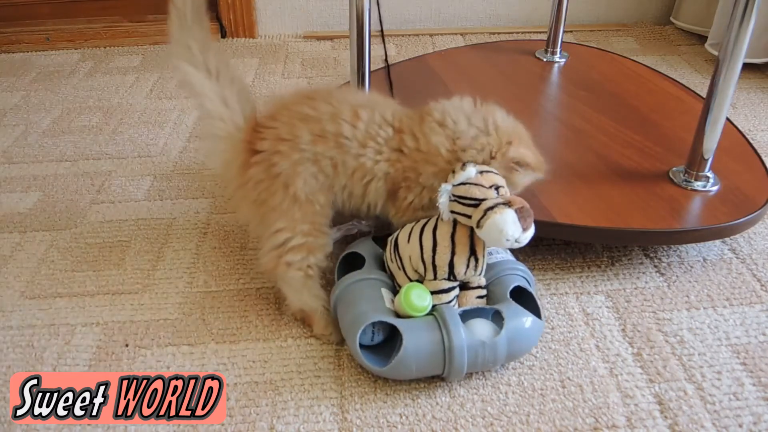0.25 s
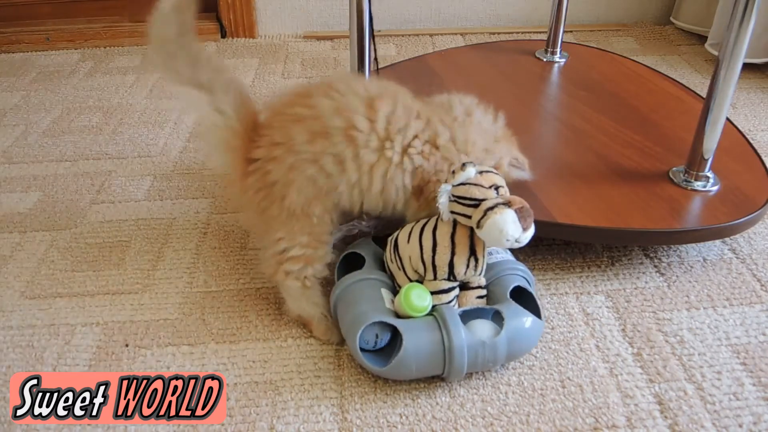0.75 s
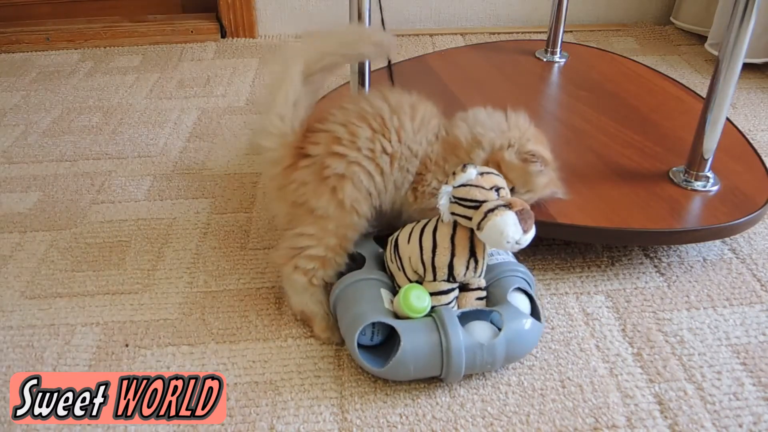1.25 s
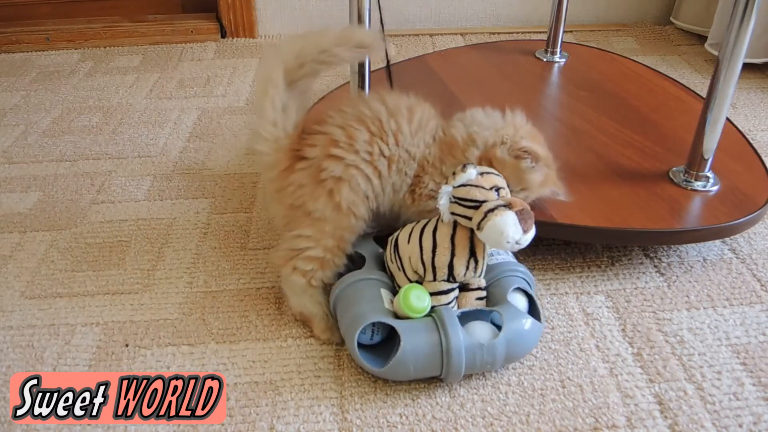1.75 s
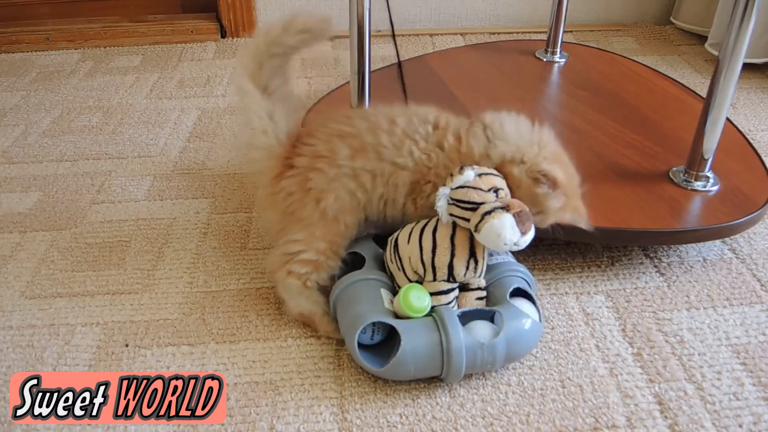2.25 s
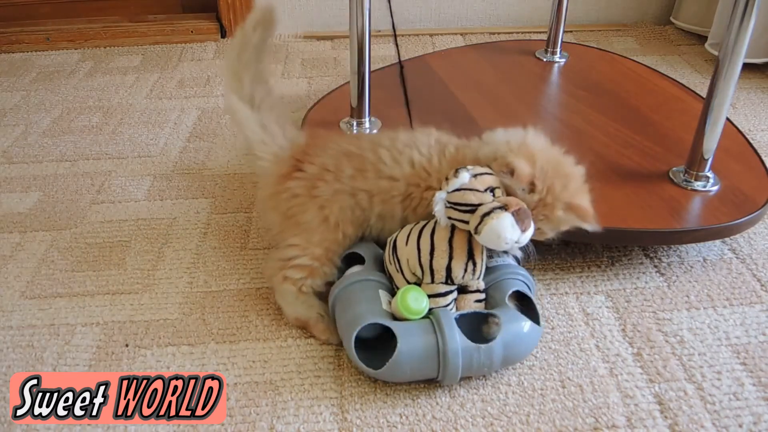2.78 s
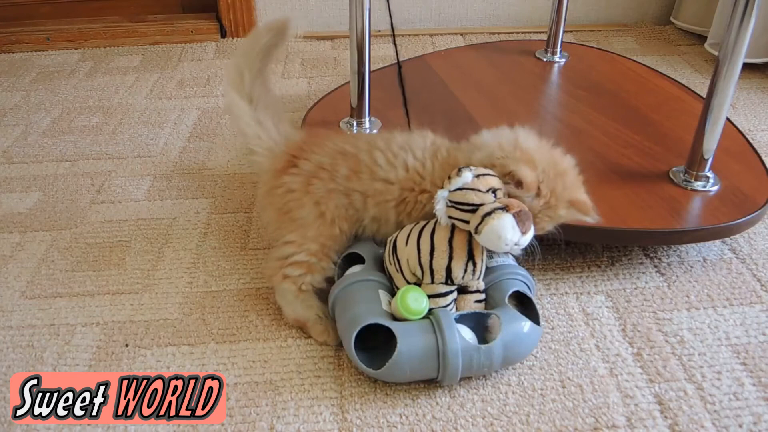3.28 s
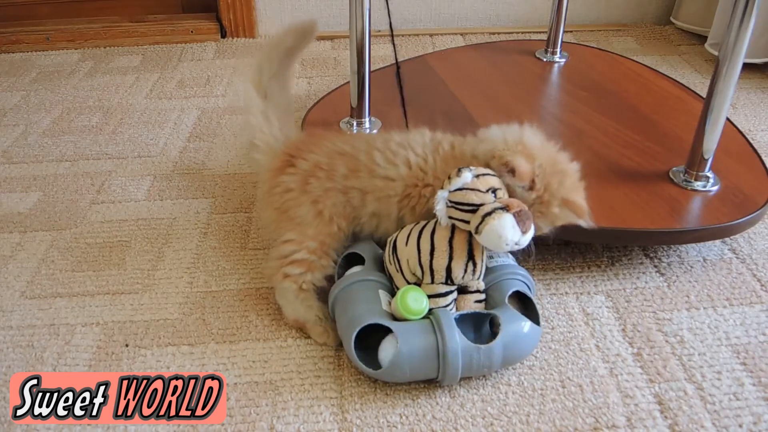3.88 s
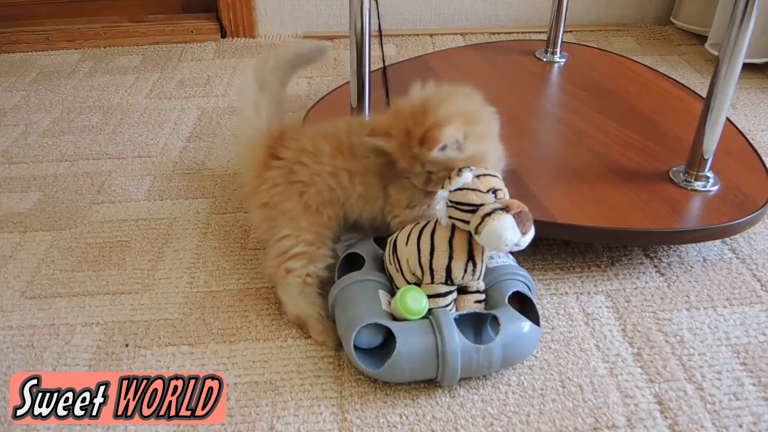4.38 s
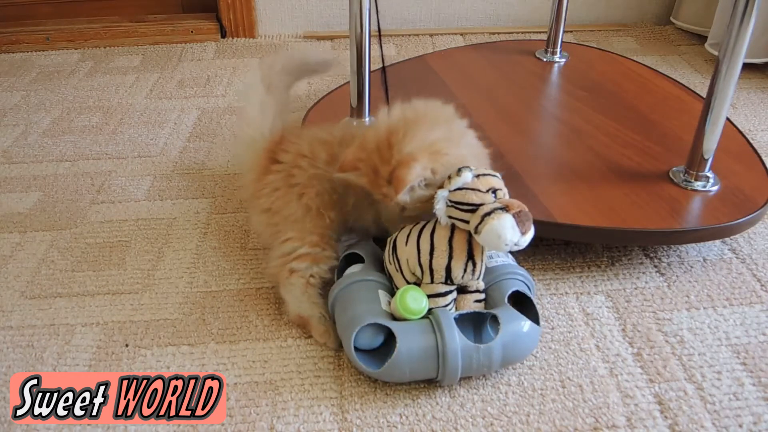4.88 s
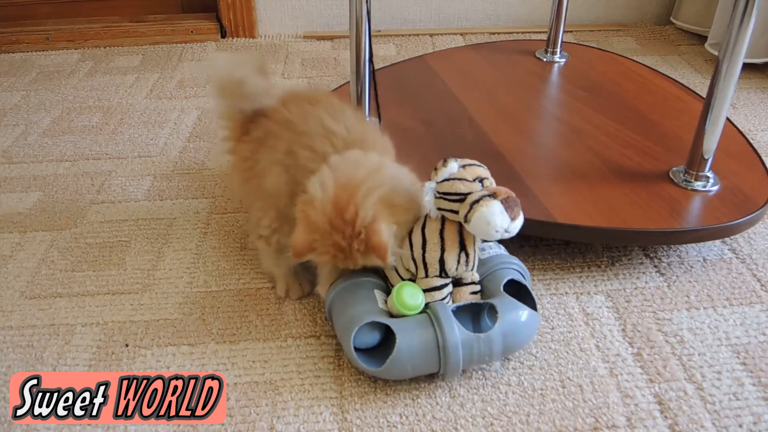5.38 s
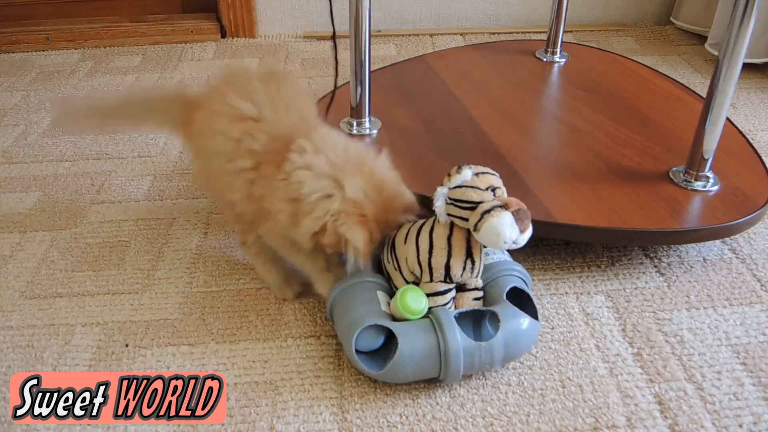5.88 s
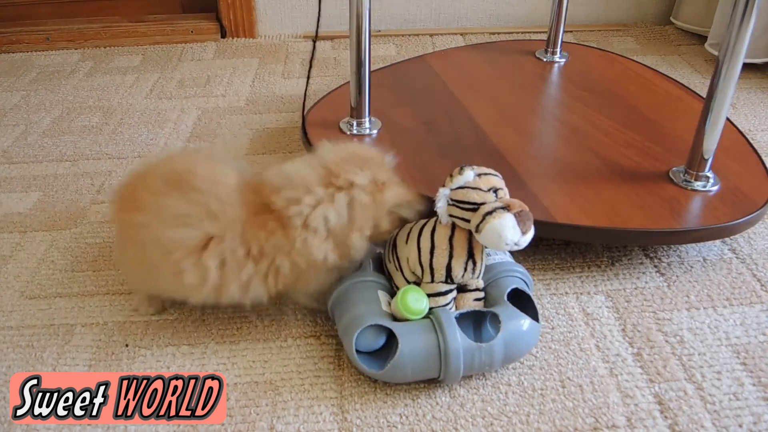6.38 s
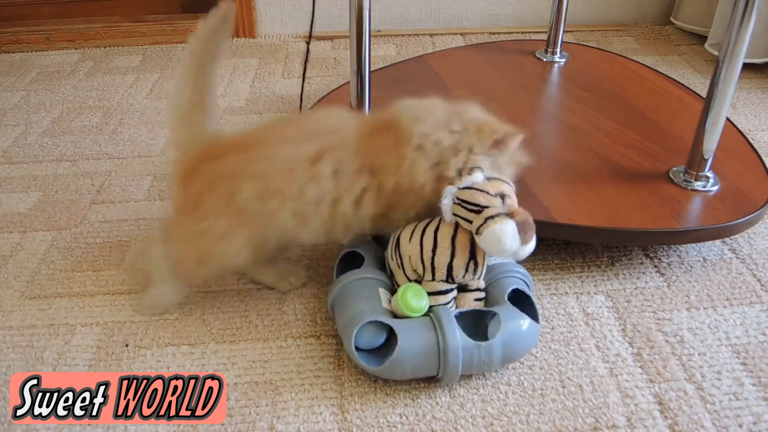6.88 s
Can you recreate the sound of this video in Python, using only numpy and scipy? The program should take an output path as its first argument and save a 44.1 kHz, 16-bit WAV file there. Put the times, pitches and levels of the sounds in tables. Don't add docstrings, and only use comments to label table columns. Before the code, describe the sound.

Soft room hum and microphone hiss run throughout in a quiet carpeted room, heard in stereo from about a metre. For the first two seconds there is only a very faint tap at 0.1, light fur brushing and barely audible claw scrapes. At 2.5 quick plastic knocks begin, and from 2.75 to 2.9 a swatted ball rattles loudly round a hollow tube, with bright clacks and woody resonance, settling in tiny bounces until 3.1. Single light knocks follow at 3.2, 3.3 and 3.6, then weak ones around 4.2 to 4.4. A distinct hollow ball drop lands at 4.55. Faint clicks and scratching come near 5.2, then soft brushing. From 5.9 scuffs and claw scrapes grow busier, with taps and a low soft paw thud near 6.2. A second, longer clatter runs from 6.4 to 6.9, thinning to a few small knocks and a faint scrape just after 7.

```python
import sys
import numpy as np
from scipy import signal
from scipy.fft import rfft, irfft
from scipy.io import wavfile
from scipy.ndimage import uniform_filter1d

SR = 44100
rng = np.random.default_rng(int(sys.argv[2]) if len(sys.argv) > 2 else 0)


def put_to_file(sound):
    columns = np.atleast_2d(sound).T
    safe = np.clip(columns, -1, 1)
    whole_steps = np.round(safe * 32767)
    wavfile.write(sys.argv[1], SR, whole_steps.astype(np.int16))


def boost(x):
    u = np.asarray(x, float) / 20
    return 10 ** u


N = 314874
RING_SAMPLES = 2048

# freq_hz, density_db
AIR_SPECTRUM = [(22, -11), (65, -4), (95, -6), (200, -4), (240, -2), (325, -8), (410, -3.5), (500, -8.5),
                (700, -10.5), (950, -13.5), (2000, -18), (5700, -20.5), (10000, -23.5), (14250, -28),
                (14500, -35)]
# freq_hz, side_re_mid_db
AIR_WIDTH = [(60, -10), (110, -5.5), (200, -8), (380, -8.5), (700, -5), (1290, -3.5), (2380, -2), (4400, 0),
             (8120, -4), (15000, -2.5)]
# freq_hz, width_hz, level_db
TUBE_MODES = [(356, 180, -8.5), (620, 510, 1.5), (896, 183, 2.5), (1160, 68, 7), (1445, 580, -2),
              (1800, 300, -4)]
# freq_hz, width_hz, level_db
WALL_MODES = [(2320, 680, 12.5), (3000, 275, 18.5), (3600, 1500, 11), (4750, 400, -36), (5560, 1700, 16.5)]
# freq_hz, width_hz, level_db
PORT_MODES = [(9020, 400, 2), (7000, 1100, -13), (9980, 600, 0), (11700, 2400, -7), (14600, 2500, -19)]
# start_s, blow_db, tube_hz, wall_hz, crack_re_blow_db
TAPS = [(0.133, -44.5, 1110, 4900, -10), (2.527, -25.5, 1240, 2860, -13), (2.53, -29.5, 870, 4370, -12),
        (2.561, -22, 870, 3600, -16), (2.575, -33, 1260, 4100, 4), (2.596, -26, 800, 2580, -40),
        (3.166, -30.5, 1100, 3600, -11.5), (3.325, -30, 1130, 5300, -13.5), (3.614, -29.5, 600, 4100, -17),
        (3.631, -40, 576, 3880, -17), (3.645, -34, 650, 3770, -22), (4.208, -37, 1040, 4140, -15.5),
        (4.222, -51, 1180, 2400, -21), (4.376, -36, 1040, 1800, -19), (5.181, -43, 700, 2400, -18),
        (5.266, -43, 1010, 4300, 1.5), (6.129, -33.5, 1360, 3270, -19), (6.189, -31, 1110, 3520, -20),
        (6.205, -29, 1280, 3020, -25), (6.279, -26.5, 1060, 2880, -19), (6.433, -28, 920, 2040, -22),
        (6.437, -18, 660, 2640, -24), (6.484, -21, 900, 3600, -7), (7.045, -27, 1020, 3040, -21)]
# start_s, blow_db, wall_hz, crack_re_blow_db
FIRST_RUN = [(2.732, -35, 2280, 3), (2.764, -8.5, 2000, -20.5), (2.773, -34, 4400, -11),
             (2.778, -16.5, 2800, -25), (2.782, -20, 3660, -16), (2.8054, -13, 4470, -19),
             (2.817, -13, 3540, -6), (2.823, -33, 3770, -21), (2.835, -18, 2040, -26),
             (2.841, -15, 2300, -13), (2.8785, -18.5, 3430, -15), (2.885, -14, 2000, -25),
             (2.897, -32, 3370, -2), (2.905, -34, 3250, 1), (2.912, -39, 3170, 1)]
# start_s, blow_db, wall_hz, crack_re_blow_db
SECOND_RUN = [(6.453, -14.5, 3850, -27), (6.463, -40, 2330, -16), (6.503, -13.5, 2900, -22),
              (6.521, -34, 2840, -27), (6.534, -17, 3000, -27), (6.551, -14, 3100, -48),
              (6.57, -19, 3140, -34), (6.596, -14, 2740, -29), (6.61, -31, 3000, -24),
              (6.623, -36, 2630, -24), (6.63, -17, 3000, -28), (6.659, -19.5, 3070, -30),
              (6.666, -14.5, 3100, -38), (6.689, -20, 3660, -24), (6.754, -38, 2830, -22),
              (6.795, -16, 1940, -18), (6.802, -20, 3030, -24), (6.813, -26, 3120, -36),
              (6.836, -21, 1900, -11.5), (6.863, -23, 3500, -17), (6.879, -41, 2980, -21),
              (6.894, -44, 3000, -5), (6.914, -38, 3000, -25), (7.017, -32, 3000, -46),
              (7.072, -33, 3000, -20)]
# start_s, blow_db
SETTLING = [(2.927, -23), (2.939, -20.5), (2.959, -25), (2.968, -29), (2.984, -23.5), (2.99, -29),
            (3.002, -24), (3.017, -47), (3.028, -31), (3.046, -40), (3.076, -36), (4.439, -41.5)]
# time_s, pitch_hz
BALL_PITCH = [(2.76, 1266), (2.89, 1340), (2.93, 1205), (3.08, 1140), (4.56, 1247), (6.45, 1360),
              (6.5, 1066), (6.66, 1070), (6.82, 1170), (7.05, 1020)]
# start_s, blow_db, wall_hz, wall_re_blow_db, crack_re_blow_db
CLAW_TAPS = [(.817, -59.5, 3300, 4, -13), (0.818, -56, 2120, 0, -24), (0.869, -55, 3200, -3, -14),
             (2.342, -45.5, 3220, 2.5, 0), (2.342, -54, 4600, 8.5, -20), (2.574, -29, 5570, -4, -30),
             (3.604, -41, 2000, -14, -17), (4.56, -12, 3100, -29.5, -19.5), (4.694, -40, 2110, -21, -20),
             (5.269, -48.5, 1920, 0, -30), (5.926, -43, 4550, -12, 11), (6.096, -52, 4600, -2.5, -11),
             (6.246, -36.5, 2250, -8.5, -16), (6.258, -42, 3500, 0, -2), (6.327, -39.5, 2580, -3.5, -26),
             (6.735, -16, 2200, -16.5, -13), (6.763, -28, 2880, -11.5, -12), (7.132, -39, 4860, -3, -10)]
# time_s, rolling_db, paw_pressure_db
DRIVES = [
    [(2.654, -63, -53), (2.734, -57, -45), (2.794, -39.5, -42), (2.87, -48, -37), (2.914, -49, -42.5),
     (2.982, -54, -42), (3.062, -56.5, -51), (3.124, -64, -70), (3.288, -80, -78)],
    [(6.33, -72, -62), (6.458, -45, -47), (6.524, -56, -39.5), (6.596, -51, -42.5), (6.678, -58, -37.5),
     (6.736, -48.5, -46), (6.824, -53, -49), (6.878, -51, -59), (7.01, -80, -95)],
]
# peak_s, rise_s, fall_s, level_db
BRUSHES = [(.15, 0.044, 0.048, -53), (1.27, 0.092, 0.042, -55.5), (2.14, .033, 0.028, -52),
           (2.4, 0.2, 0.1, -56), (2.43, 0.063, 0.068, -47), (2.445, .004, .014, -48),
           (3.22, 0.048, 0.062, -45.5), (3.345, 0.015, 0.019, -44), (4.36, 0.08, 0.064, -54.5),
           (5.52, 0.11, 0.069, -53), (5.8, .06, 0.14, -49), (5.91, 0.0052, 0.004, -39),
           (5.938, .003, 0.007, -40), (5.952, .006, .009, -37), (5.99, 0.01, .01, -46),
           (6.125, .005, .012, -50), (6.16, 0.014, 0.0079, -56), (6.223, .003, .003, -45),
           (6.26, .005, 0.0071, -37), (6.3, 0.022, 0.0089, -51), (6.352, .003, .015, -45),
           (3.185, .008, .005, -50), (3.25, 0.0099, 0.027, -60), (2.415, 0.015, .012, -60),
           (6.463, .008, 0.0035, -47), (2.73, 0.0034, .008, -38), (2.828, .006, .008, -46),
           (6.387, 0.0073, 0.01, -19.5), (6.397, .005, .01, -27), (6.413, 0.006, 0.014, -37),
           (6.665, 0.015, 0.015, -29.5), (6.69, .008, 0.0095, -34), (6.708, 0.0087, 0.01, -42),
           (2.756, 0.022, 0.035, -27.5)]
# peak_s, rise_s, fall_s, level_db
SCRAPES = [(.3, 0.39, 0.24, -75), (.29, 0.0087, 0.011, -58), (2.26, 0.027, .03, -61.5),
           (.58, 0.04, 0.029, -63.5), (.96, 0.047, 0.14, -57.5), (1.12, 0.011, 0.013, -60.5),
           (2.575, 0.048, 0.0059, -46), (2.69, 0.0063, 0.048, -46.5), (4.7, .015, 0.028, -56.5),
           (5.156, 0.0093, 0.016, -48), (5.36, 0.11, 0.038, -54.5), (6.016, 0.012, 0.0058, -42.5),
           (6.2, 0.15, 0.24, -54), (6.262, 0.029, 0.03, -46), (6.332, 0.0044, 0.0077, -57),
           (6.16, .02, 0.01, -49), (2.4, .012, 0.015, -55), (6.364, 0.0062, .015, -39),
           (6.39, 0.012, 0.0089, -44), (6.412, 0.0071, 0.021, -36.5), (6.459, 0.016, 0.0048, -34),
           (6.71, 0.016, 0.0082, -45), (7.096, 0.0043, 0.013, -42), (7.14, 0.31, .03, -59)]
# peak_s, rise_s, fall_s, level_db
SHOVES = [(.96, 0.07, 0.032, -60.5), (2.45, .004, .014, -58), (2.55, 0.089, 0.06, -56),
          (2.753, 0.008, 0.016, -29.5), (2.841, 0.012, 0.0032, -30), (3.625, 0.012, 0.035, -54),
          (4.567, 0.0025, 0.013, -51), (4.22, 0.01, 0.038, -54), (5.272, 0.0027, 0.01, -49),
          (6.335, 0.0042, 0.014, -43), (6.91, 0.081, 0.02, -56.5), (7.13, 0.12, 0.033, -58)]
# tube_db, wall_db, fur_db
STROKE_MIX = [
    (-24, -16, -1.5),
    (-14, -5, -0.5),
    (-3.5, -8.5, -3.5),
]
# start_s, level_db, pitch_hz, decay_s
TICKS = [(2.571, -25, 6940, 0.0011), (2.69, -41, 2210, 0.0037), (2.709, -37, 2500, .002),
         (2.719, -42, 2600, 0.0025), (2.938, -40, 4100, .002), (2.963, -43, 4240, .006),
         (2.992, -37, 1950, 0.0018), (2.984, -43, 3430, 0.0017), (3.032, -40, 4050, .002),
         (3.618, -34, 6860, 0.00084), (3.632, -37, 4100, 0.0011), (3.634, -39, 6900, .001),
         (3.645, -41, 6700, .001), (3.645, -48, 3950, .001), (5.267, -28.5, 4330, 0.00097),
         (5.269, -28.5, 7700, 0.00078), (6.016, -48, 3060, 0.0015), (6.254, -43, 2480, .003),
         (6.41, -32, 2320, 0.0032), (6.432, -31, 7100, 0.0011), (6.81, -31, 6000, 0.001),
         (6.484, -17, 8720, 0.0021), (2.818, -23, 3740, 0.0032), (2.784, -21, 3600, 0.0022),
         (0.942, -59, 3330, .012), (0.972, -56, 3900, 0.013), (2.909, -35, 3330, .002),
         (2.888, -31, 3460, 0.0018), (6.765, -38, 2950, .003)]
# start_s,
# level_db, pitch_hz, decay_s
ROCKING = [(2.897, -29, 960, 0.004), (2.905, -29, 1280, .003), (2.912, -39, 1300, 0.0027),
           (2.95, -39, 1200, 0.0027), (2.967, -47, 1340, .003), (2.991, -33, 1150, .004),
           (3.016, -35, 1160, 0.0048), (3.037, -38, 1130, .004), (3.058, -41, 1220, 0.0034),
           (3.068, -46, 1210, .005), (3.088, -44, 1160, .004), (3.097, -52, 1160, .005),
           (3.107, -59, 1150, 0.0035), (3.613, -42, 1080, 0.0057), (3.632, -44, 1100, .006),
           (3.654, -47, 900, .004), (4.214, -38.5, 1100, 0.0045), (4.224, -54, 1150, .008),
           (4.375, -46, 575, 0.0045), (4.566, -29, 1660, 0.0046), (4.586, -45, 1620, 0.013),
           (4.61, -46, 1400, .015), (5.27, -39.5, 890, 0.0037), (5.275, -42, 1050, 0.0034),
           (5.279, -40.5, 1180, 0.0057), (5.179, -47, 1223, 0.0067), (5.312, -42, 1800, .002),
           (5.331, -45, 2000, 0.0018), (6.133, -50, 1210, 0.0065), (6.181, -42, 1210, 0.0026),
           (6.215, -35, 1080, 0.0019), (6.326, -41, 1350, .008), (6.441, -29, 1170, .004),
           (6.446, -32, 1020, .005), (6.46, -38, 1150, .005), (6.529, -32, 1100, .002),
           (6.572, -32, 940, 0.0025), (6.622, -33, 1100, 0.0018), (6.76, -36, 960, .002),
           (2.751, -27, 1214, .005), (2.804, -24, 1290, 0.0036), (2.822, -19, 1187, 0.0053),
           (3.326, -47, 1060, 0.0034), (6.657, -19.5, 1105, 0.0039), (6.663, -21, 970, 0.0015),
           (6.813, -33, 1200, 0.0035), (6.882, -32, 1140, 0.0026)]
# start_s, level_db, pitch_hz, decay_s
THUDS = [
    (6.222, -36, 148, 0.018),
    (6.27, -40, 143, 0.018),
    (5.28, -53, 63, 0.053),
    (5.52, -56, 66, 0.055),
]
# delay_s, level_db
ECHOES = [
    (.0055, -14.5),
    (.0095, -17),
]
# freq_hz, level_db
TOP_END = [(14250, 0), (14450, -4), (15750, -5), (16200, -80)]


def unit(x):
    return x / np.sqrt(np.mean(x ** 2))


def shaped(points):
    hz, db = np.transpose(points)
    log_hz = np.log(np.fft.rfftfreq(N, 1 / SR) + 1)
    gain = boost(np.interp(log_hz, np.log(hz), db))
    return irfft(rfft(rng.standard_normal(N)) * gain, N)


def resonate(x, modes):
    total = 0
    for k, (hz, width_hz, db) in enumerate(modes):
        b, a = signal.iirpeak(hz, hz / width_hz, SR)
        total = total + (-1) ** k * boost(db) * signal.lfilter(b, a, x)
    return total


def place(start_s, waves):
    length = waves.shape[1]
    at = (start_s * SR).astype(int)[:, None] + np.arange(length)
    return np.bincount(at.ravel(), waves.ravel(), N + length)[:N]


def rings(start_s, db, hz, decay_s, rise_s):
    t = np.arange(2 * RING_SAMPLES) / SR
    swell = 1 - np.exp(-(t / rise_s) ** 2)
    decay = np.exp(-(t / np.reshape(decay_s, (-1, 1))) ** 1.4)
    return place(start_s, boost(db)[:, None] * swell * decay * np.sin(2 * np.pi * np.outer(hz, t)))


def grains(rate_hz, spread_db, smooth):
    touch = rng.random(N) < rate_hz / SR
    size_db = spread_db * np.minimum(rng.exponential(size=N), 2.5)
    size = boost(size_db) * rng.choice([-1, 1], N)
    return unit(touch * size) + smooth * rng.standard_normal(N)


def air():
    level_db, swell_db = -56, 0.78
    swell = boost(swell_db * unit(uniform_filter1d(rng.standard_normal(N), 9000)))
    hz, db = np.transpose(AIR_SPECTRUM)
    width_hz, width_db = np.transpose(AIR_WIDTH)
    side_db = db + np.interp(np.log(hz), np.log(width_hz), width_db)
    mid = shaped(AIR_SPECTRUM)
    side = shaped(np.transpose([hz, side_db]))
    return swell * boost(level_db) / np.std(mid) * np.array([mid + side, mid - side])


def passing_pitch(start_s):
    scatter = 0.048 * rng.standard_normal(len(start_s))
    return np.interp(start_s, *np.transpose(BALL_PITCH)) * (1 + scatter)


def ball_blows(events, wall_base_db):
    start_s, db, tube_hz, wall_hz, crack_db = events
    panel_db = -3.5 * np.log2(wall_hz / 3000)
    hardness_db = 0.2 * (crack_db + 15)
    return [start_s, db, tube_hz, wall_hz, wall_base_db + panel_db + hardness_db, crack_db]


def blows():
    rows = [ball_blows(np.transpose(TAPS), -20)]
    for run, wall_base_db in ((FIRST_RUN, -17), (SECOND_RUN, -22.5)):
        start_s, db, wall_hz, crack_db = np.transpose(run)
        rows.append(ball_blows([start_s, db, passing_pitch(start_s), wall_hz, crack_db], wall_base_db))
    start_s, db = np.transpose(SETTLING)
    wall_hz = 4120 * boost(0.33 * rng.standard_normal(len(start_s)))
    crack_db = np.full(len(start_s), -17.0)
    rows.append(ball_blows([start_s, db, passing_pitch(start_s), wall_hz, crack_db], -25))
    start_s, db, *shell = np.transpose(CLAW_TAPS)
    rows.append([start_s, db, passing_pitch(start_s), *shell])
    return np.hstack(rows)


def knocks():
    s, db, tube_hz, wall_hz, wall_re_db, crack_db = blows()
    wall_db = db + wall_re_db
    chance = rng.standard_normal((len(s), RING_SAMPLES))
    tube = rings(s, db - 0.5, tube_hz, 0.0018, 0.00088)
    tube += rings(s, db - 18.5, tube_hz * 1.262 * boost(0.5 * chance[:, 0]), 0.0062, 0.002)
    wall = rings(s, wall_db + 11.5, wall_hz, 0.0018, 0.00055)
    wall += rings(s, wall_db + 7.5, wall_hz * (1.333 + 0.13 * chance[:, 1]), 0.001, 0.00025)
    thump = rings(s, db - 23.5, 430 * (1 + 0.24 * chance[:, 2]), 0.0071, 0.0025)
    thump += rings(s, db - 16, 630 * (1 + 0.042 * chance[:, 3]), 0.0044, 0.0018)
    t = np.arange(RING_SAMPLES) / SR / 0.00059
    burst = t * np.exp(-t)
    chatter = boost(db + crack_db + 25.5)[:, None] * burst
    crack = np.array([place(s, chatter * (chance + 0.69 * np.roll(chance, k, 0))) for k in (1, 2)])
    crack = signal.lfilter(*signal.butter(2, 6500, "high", fs=SR), crack)
    snap = place(s, boost(wall_db + 8)[:, None] * chance[:, ::-1] * burst)
    linger = (t / 9) * np.exp(-t / 9)
    jitter = place(s, boost(db - 34)[:, None] * np.roll(chance, 3, 0) ** 3 * linger)
    body = tube + wall + thump + resonate(jitter, TUBE_MODES) + resonate(snap, WALL_MODES[:4])
    return body, crack


def rubbing_gains():
    t = np.arange(N) / SR
    gains = np.zeros((3, N))
    for time_s, ball_db, paw_db in map(np.transpose, DRIVES):
        layers_db = (ball_db, paw_db - 7.5, paw_db)
        gains += [boost(np.interp(t, time_s, layer_db, -120, -120)) for layer_db in layers_db]
    for strokes, mix_db in zip((BRUSHES, SCRAPES, SHOVES), STROKE_MIX):
        force = np.zeros(N)
        for peak_s, rise_s, fall_s, db in strokes:
            side_s = np.where(t < peak_s, rise_s, fall_s)
            force += boost(db) * np.exp(-((t - peak_s) / side_s) ** 2)
        gains += boost(mix_db)[:, None] * force
    return gains


def rubbing():
    patch_s, patchy_db = 0.0048, 3
    slips = rng.standard_normal((3, N))
    for _ in range(2):
        slips = uniform_filter1d(slips, int(patch_s * SR), axis=1)
    roll, claw, fur = rubbing_gains() * boost(patchy_db * unit(slips))
    body = roll * unit(resonate(grains(500, 2.5, 0.39), TUBE_MODES))
    body += claw * unit(resonate(grains(2000, 3.5, 0.8), WALL_MODES))
    shared, *own = [unit(grains(4000, 4.5, 0.7)) for _ in range(3)]
    return body, boost(4.5) * fur * (shared + 0.48 * np.array(own))


def ticks():
    return rings(*np.transpose(TICKS), 0.00015)


def rocking():
    return rings(*np.transpose(ROCKING), 0.00082)


def thuds():
    return rings(*np.transpose(THUDS), 0.0032)


def even(tail):
    length = tail.shape[1]
    bins = rfft(tail, 2 * length)
    power = uniform_filter1d(np.abs(bins) ** 2, size=90, axis=1)
    return irfft(bins / np.sqrt(power))[:, :length]


def room(body, treble):
    t60_s, level_db, dull_hz = 0.2, -11.5, 2600
    bright_t60_s, bright_db = 0.15, -10.5
    t = np.arange(int(0.5 * SR)) / SR
    shared, own = rng.standard_normal(len(t)), rng.standard_normal((2, len(t)))
    build = 1 - np.exp(-(t / 0.00029) ** 2)
    own_high = own - signal.lfilter(*signal.butter(1, 900, fs=SR), own)
    tail = even((shared + 0.12 * own_high) * build * 1000. ** (-t / t60_s))
    tail = signal.lfilter(*signal.butter(1, dull_hz, fs=SR), tail)
    reply = boost(level_db) * tail / np.sqrt(np.sum(tail ** 2) / 2)
    for delay_s, db in ECHOES:
        reply[:, int(delay_s * SR)] += boost(db)
    bright = even((own + 2.5 * shared) * build * 1000. ** (-t / bright_t60_s))
    bright *= boost(bright_db) / np.sqrt(np.sum(bright ** 2) / 2)
    wet = signal.fftconvolve(body[None], reply, axes=1) + signal.fftconvolve(treble, bright, axes=1)
    return wet[:, :N]


def at_camera(body, treble):
    left, right = treble
    late = 0.26 * left + 0.55 * np.roll(left, 1)
    return body + np.array([boost(3.5) * late, boost(-4.5) * right])


def scene():
    background = air()
    knock, crack = knocks()
    rumble, brush = rubbing()
    body = knock + rumble + ticks() + rocking()
    treble = resonate(crack + brush, PORT_MODES)
    toy = at_camera(body, treble) + room(body, treble) * boost(np.array([[0.3], [-0.3]]))
    toy = toy - 0.55 * resonate(toy, [(5400, 1500, 0)])
    return toy + thuds() + background


def low_pass(x):
    return signal.sosfilt(signal.butter(12, 16500, fs=SR, output="sos"), x)


def record(dry):
    hz, db = np.transpose(TOP_END)
    gain = boost(np.interp(np.fft.rfftfreq(N, 1 / SR), hz, db))
    mix = irfft(rfft(dry) * gain, N)
    return low_pass(mix)


dry = scene()
out = record(dry)
put_to_file(out)
```